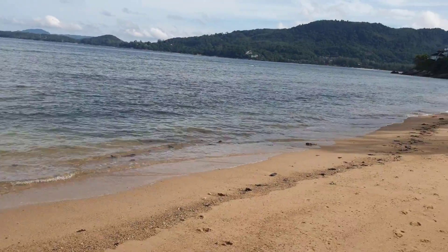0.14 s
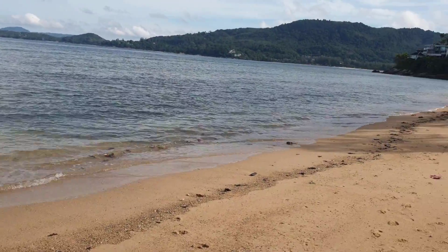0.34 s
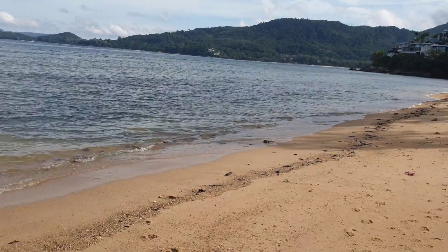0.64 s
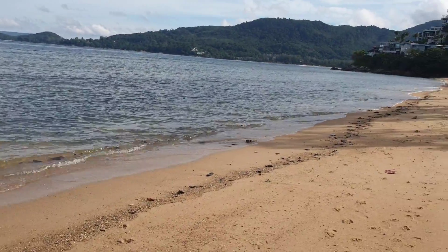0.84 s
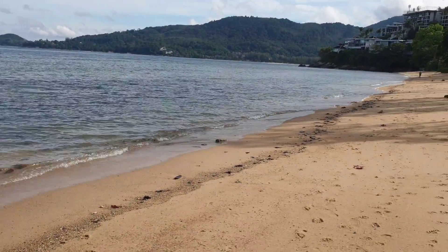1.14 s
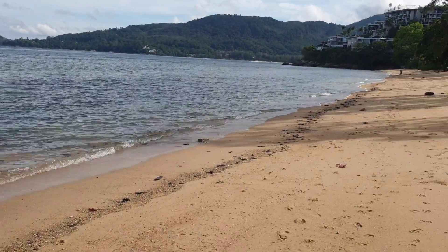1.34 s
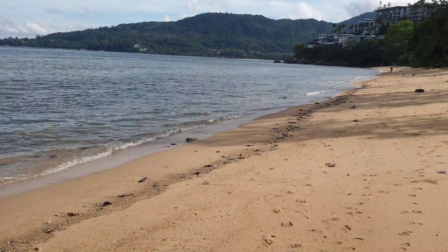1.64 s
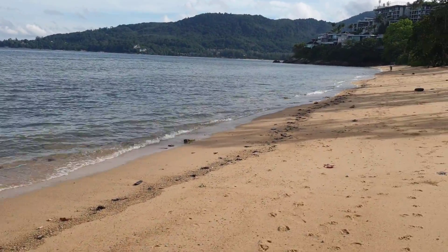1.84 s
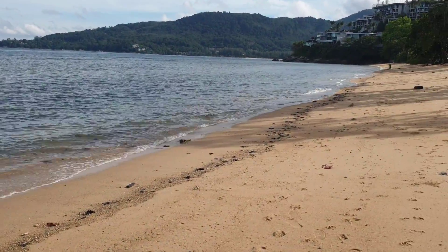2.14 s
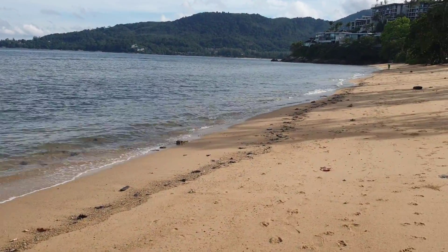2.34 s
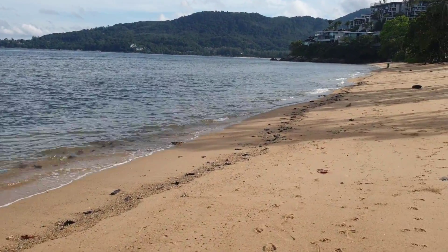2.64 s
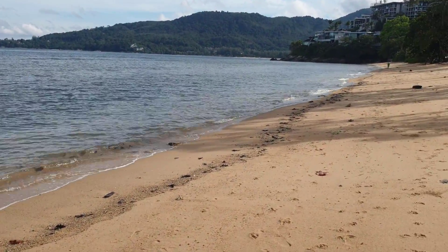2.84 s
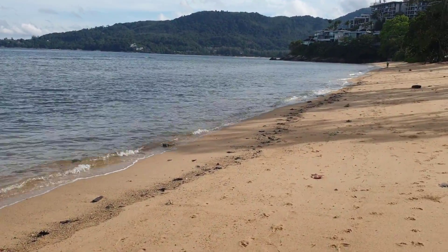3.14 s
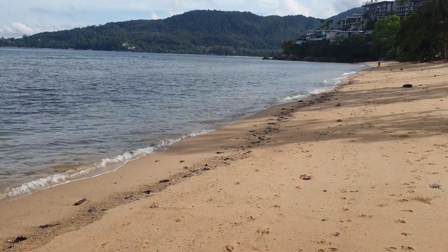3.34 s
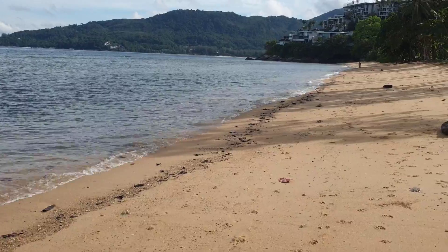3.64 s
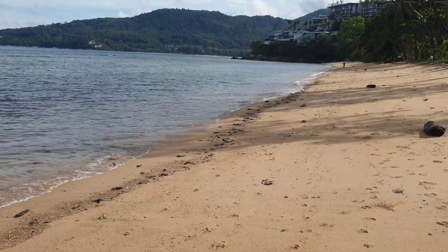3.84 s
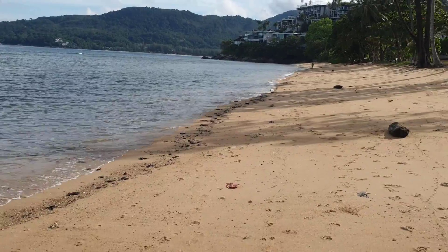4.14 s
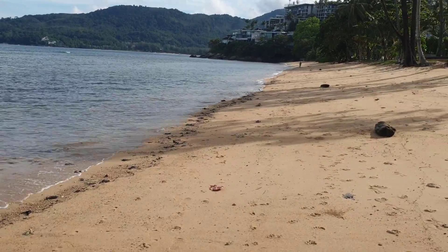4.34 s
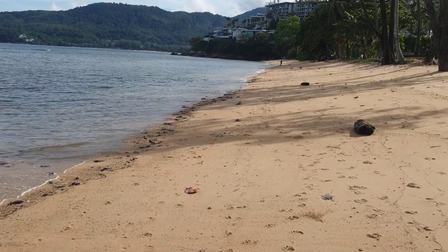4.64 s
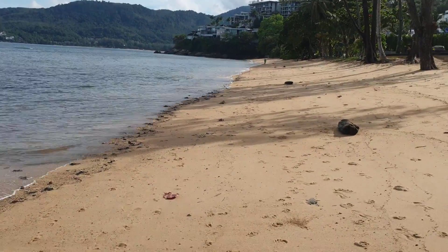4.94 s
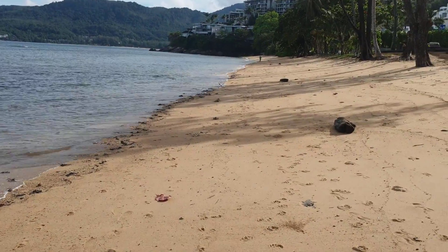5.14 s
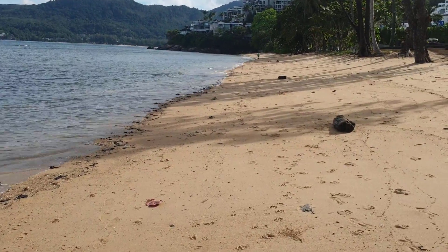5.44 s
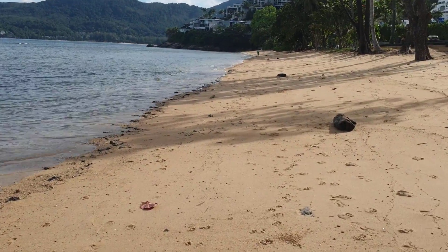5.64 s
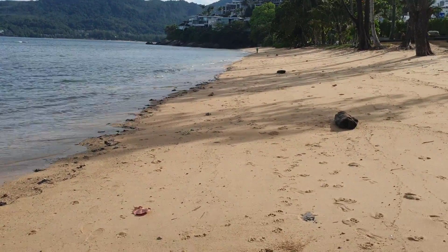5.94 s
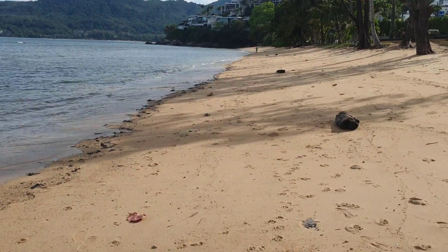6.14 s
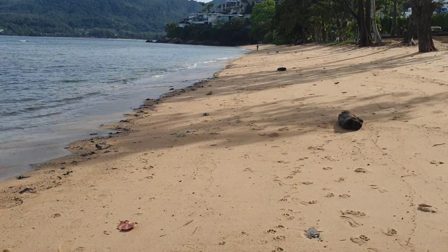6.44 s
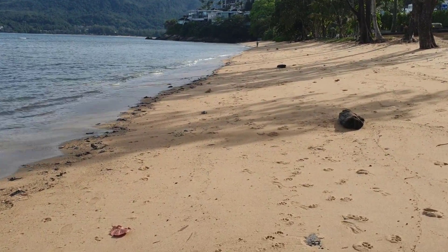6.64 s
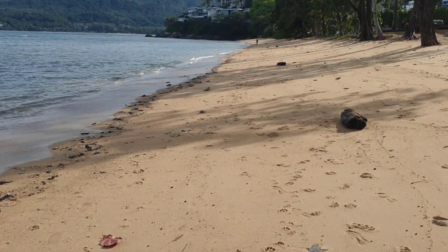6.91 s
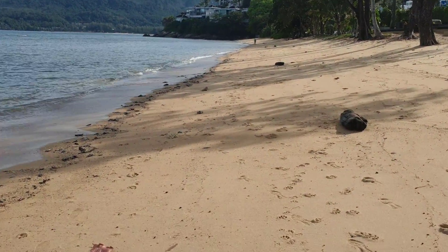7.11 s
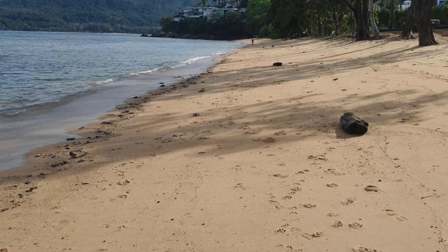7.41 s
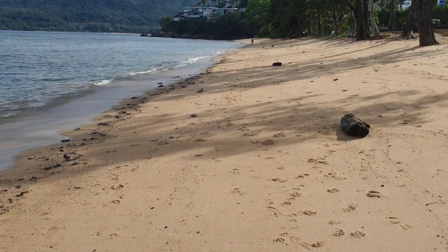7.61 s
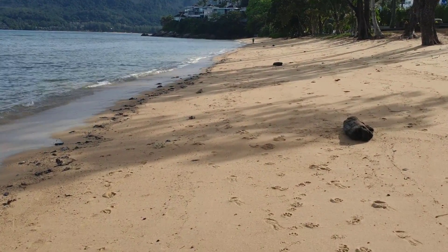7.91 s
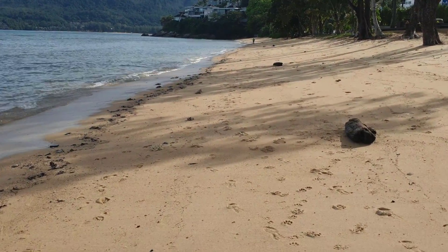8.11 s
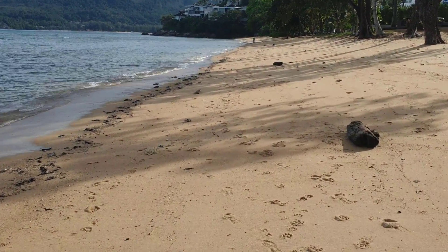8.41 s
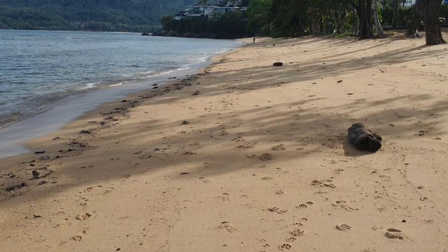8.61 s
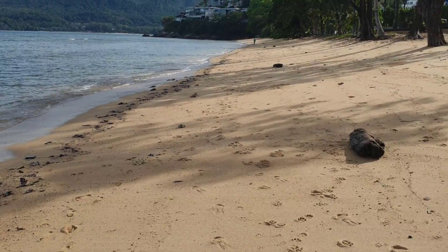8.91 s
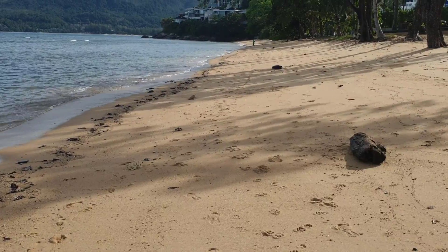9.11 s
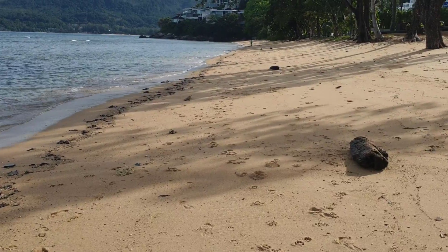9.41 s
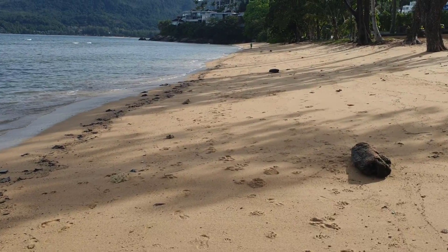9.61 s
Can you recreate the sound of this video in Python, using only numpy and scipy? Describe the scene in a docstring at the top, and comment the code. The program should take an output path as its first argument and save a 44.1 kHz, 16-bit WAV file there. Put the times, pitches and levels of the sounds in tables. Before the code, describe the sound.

Outdoor beach in stereo, with the water clearly louder on the right. Gentle wavelets bubble and trickle, swell into a crisp plunge with little pops, then thin to hissing foam. After a lull a second rounded, gurgling wave runs in, fading to sparse distant lapping before closer bubbling returns at the end. Low wind flutter and a few soft puffs touch the left side over a quiet sea murmur.

```python
"""A sandy beach: small waves curl over in clouds of bubbles and run up the sand as fizzing foam.
The water is filtered noise mixed with ringing bubbles. Large bubbles come mostly as a wave plunges;
small ones hiss on between waves. Splashes, slaps and the murmur of open water add to it.
The water is much louder on the right. On the left, a light breeze flutters (low noise) and thumps
(short low pulses)."""
import sys
import numpy as np
from scipy import signal
from scipy.fft import rfft, irfft, next_fast_len
from scipy.io import wavfile
from scipy.ndimage import uniform_filter1d

SR = 44100
rng = np.random.default_rng(int(sys.argv[2]) if len(sys.argv) > 2 else 0)


def inscribe(sig):
    """Save sig as 16-bit PCM at rate SR to the path in sys.argv[1].

    A 1-D sig is mono; a 2-D sig holds one channel per row.
    Samples are clipped to [-1, 1] before scaling.
    """
    pcm = np.round(np.clip(np.atleast_2d(sig).T, -1, 1) * 32767)
    wavfile.write(sys.argv[1], SR, pcm.astype(np.int16))


N = 430416

# Water levels in these tables hold before the pickup on the sand and at the microphones.

# Waves that spill, keep breaking, then die away. Depth adds large bubbles, fizz adds tiny ones.
# Columns: start_s, rise_s, hold_s, level_db, depth_db, fizz_db
WAVES = [(-0.11, 0.3, 0.34, -52, -12, 3), (0.268, 0.43, 0.01, -43.5, -2, 3),
         (0.917, 0.25, 0.025, -39, 0, 2), (1.223, 0.17, 0.28, -47.5, -2.5, 8),
         (1.62, 0.38, 0.017, -48, -0.5, 11.5), (2.496, 0.66, 0.14, -40, 6, 1),
         (2.914, 0.31, 0.17, -37, 8, 9.5), (5.466, 0.53, 0.24, -34, 3.5, 5.5),
         (6.27, 0.13, 0.25, -36, -0.7, -3), (6.516, 0.27, 0.077, -42, 1.5, -18),
         (6.887, 0.18, 0.39, -48.5, -15, -31), (7.43, 0.39, 0.21, -54, 0.5, -4),
         (8.07, 0.65, 0.12, -48, 0.5, 8), (8.695, 0.44, 0.19, -46, -1, -7),
         (9.073, 0.31, 0.019, -46.5, 7, -37), (9.503, 0.45, 0.17, -41.5, 5, -1.5)]
# Thin sheets of foam hissing over the sand: middle_s, half_length_s, level_db, fizz_db
FOAM_SHEETS = [(2.9, 0.35, -64.5, 25), (3.502, 0.18, -39, -4), (3.9, 0.18, -51.5, 11),
               (4.197, 0.17, -44.5, -3), (4.728, 0.25, -39, -6.5), (5.287, 0.086, -56.5, -1.5),
               (5.484, 0.045, -70, 7), (7.558, 0.024, -65, 16), (8.254, 0.28, -53, -4),
               (8.67, 0.025, -56, 3), (9.248, 0.16, -59.5, 20)]
# How each bubble size follows a wave; large bubbles come late and die first. One named row per size:
# level_db, rise_power (no unit), fade_db_per_s, depth_share, fizz_share, foam_sheet_level_db
BUBBLE_SIZES = {"plunge": (-9, 2.5, 61, 1, 0, -37), "wash": (-1.5, 1, 32.5, 0.15, 0, -13.5),
                "foam": (1.1, 0.56, 29.5, 0, 0, -11), "fine foam": (-0.5, 0.5, 17.5, 0, -0.04, -2.5),
                "seethe": (-6.5, 0.37, 27, 0, 0.6437, -0.74), "spray": (-13.5, 0.5, 15, 0, 1, -5.5)}
# Tone colour of each bubble size, from large to tiny: pitch_hz, relative_level_db
PLUNGE_COLOUR = [(200, -33), (380, -18), (520, -6.5), (660, 3.5), (850, 5), (1050, -1.5), (1500, -31),
                 (2500, -81)]
WASH_COLOUR = [(400, -61), (750, -14), (1000, -5), (1400, 0.5), (1750, 1.5), (2100, -6.5), (3000, -27),
               (5000, -70)]
FOAM_COLOUR = [(1000, -46), (1500, -15), (1850, -1), (2100, 1), (2400, 0), (2700, -2), (3400, -22),
               (5000, -73)]
FINE_FOAM_COLOUR = [(1400, -71), (2100, -15.5), (2500, -2.5), (2950, 3.5), (3400, -1.5), (3900, -4.5),
                    (4800, -10.5), (6500, -17), (9000, -85)]
SEETHE_COLOUR = [(2200, -31), (3600, 4.5), (4600, -2), (5800, 3.5), (6500, -1.5), (7400, -3), (8400, -20),
                 (10000, -33), (14000, -44)]
SPRAY_COLOUR = [(5000, -11.5), (8000, -16), (10000, 2.5), (11000, 6), (12000, 3), (13200, -1),
                (14200, -3.5), (15000, -26)]
# Pockets of air that fold under the crests and gulp around one pitch:
# middle_s, half_length_s, pitch_hz, spread_octaves, level_db
AIR_POCKETS = [(0.095, 0.031, 2660, 0.42, -48.5), (0.752, 0.037, 845, 0.42, -54),
               (0.771, 0.027, 1340, 0.37, -42.5), (0.78, 0.056, 2580, 0.32, -38.5),
               (1.21, 0.12, 2950, 0.36, -38.5), (1.517, 0.025, 820, 0.23, -52),
               (1.778, 0.018, 1190, 0.33, -49.5), (2.03, 0.08, 910, 0.42, -57.5),
               (2.402, 0.094, 2400, 0.42, -47), (2.597, 0.035, 790, 0.18, -55.5),
               (2.667, 0.086, 2140, 0.54, -48.5), (2.784, 0.035, 2380, 0.24, -40),
               (3.12, 0.073, 2570, 0.32, -30.5), (3.147, 0.017, 580, 0.35, -42),
               (3.268, 0.02, 1320, 0.29, -31), (3.278, 0.1, 596, 0.28, -47),
               (3.402, 0.029, 3220, 0.42, -31), (3.492, 0.033, 1060, 0.35, -40),
               (3.89, 0.029, 630, 0.22, -42), (4.077, 0.1, 1180, 0.4, -45.5),
               (4.68, 0.035, 3740, 0.18, -42), (5.3, 0.091, 1450, 0.12, -51),
               (5.426, 0.051, 2250, 0.37, -56.5), (5.873, 0.02, 2916, 0.1, -31.5),
               (5.882, 0.054, 480, 0.37, -43), (6.03, 0.052, 290, 0.45, -54), (6.05, 0.13, 2650, 0.24, -33),
               (6.064, 0.032, 507, 0.22, -44), (6.22, 0.03, 1690, 0.27, -32.5),
               (6.304, 0.1, 564, 0.41, -45.5), (6.42, 0.11, 3120, 0.26, -39.5),
               (7.69, 0.05, 3140, 0.2, -47), (7.782, 0.026, 680, 0.22, -50),
               (7.783, 0.033, 1410, 0.27, -52), (7.83, 0.055, 2300, 0.13, -50),
               (8.238, 0.053, 3240, 0.21, -45), (8.286, 0.035, 810, 0.16, -52),
               (8.47, 0.1, 1350, 0.12, -54.5), (8.584, 0.12, 3600, 0.28, -48.5),
               (8.915, 0.069, 1270, 0.35, -46.5), (9.06, 0.039, 2210, 0.43, -40.5),
               (9.177, 0.033, 2080, 0.34, -37.5), (9.28, 0.037, 1240, 0.3, -40),
               (9.275, 0.052, 2200, 0.25, -40), (9.273, 0.054, 6650, 0.44, -41),
               (9.442, 0.073, 1480, 0.27, -47), (9.66, 0.032, 2320, 0.24, -39.5),
               (9.663, 0.051, 4630, 0.11, -50), (9.743, 0.02, 2350, 0.22, -35)]
# Share of the sound that comes from farther along the shore: time_s, far_share (0 to 1)
FAR_SHARE = [(0, 0.08), (1.2, 0.3), (1.7, 0.77), (2.3, 1), (3, 0.16), (4.9, 0.25), (5.35, 0.45), (5.7, 0.2),
             (6.7, 0.13), (7.4, 0.8), (8.4, 0.82), (9.1, 0.18), (9.76, 0.28)]
# Thin water holds no large bubbles: time_s, lowest_bubble_pitch_hz
THIN_WATER = [(0, 1440), (0.35, 940), (0.6, 437), (2.05, 450), (2.3, 680), (2.47, 1480), (2.59, 550),
              (2.85, 450), (3.25, 151), (3.6, 453), (3.68, 770), (3.81, 2000), (4.08, 1720), (4.25, 2130),
              (4.47, 2280), (4.62, 1480), (4.74, 1910), (5.05, 2100), (5.42, 2250), (5.54, 1190),
              (5.8, 150), (6.83, 475), (7.12, 1160), (7.62, 1080), (7.77, 560), (7.87, 950), (8.15, 1050),
              (8.5, 690), (9.3, 830), (9.6, 1590)]
# Ripples in the tone of far sound grazing the sand, at first and later on: pitch_hz, gain_db
EARLY_RIPPLES = [(500, 2), (720, -1.5), (1000, 1.5), (1430, 7), (1680, -2.5), (2050, 2.5), (2800, 0),
                 (3600, 6), (4300, 3.5), (5200, -0.5), (6200, -4.5)]
LATE_RIPPLES = [(500, -4), (720, 2), (980, 0), (1430, 7.5), (1650, -4.5), (2100, -3.5), (2460, 2.5),
                (2740, -4.5), (3000, 2.5), (3220, -2), (3500, 4.5), (3950, 2), (4250, 4), (4750, -3),
                (5600, -4.5), (6200, -0.5)]
# The early ripples blend into the late ones between these times: from_s, to_s
RIPPLE_CHANGE = (4.9, 9.6)
# Wavelets that flick over close by: middle_s, half_length_s, level_db
SPLASH_TIMES = [(0.4, 0.032, -43.5), (4.63, 0.027, -41.5), (6.98, 0.037, -37), (8.068, 0.049, -37.5)]
# Tone colour of the splashes: pitch_hz, relative_level_db_per_hz
SPLASH_COLOUR = [(800, -24.5), (1500, 1.5), (2200, 6.5), (3500, 9.5), (4600, 7), (5500, -0.5), (7500, -17),
                 (12000, -11)]
# Slaps and pops of the curling crest, before their bass is cut: start_s, peak_db
SLAP_TIMES = [(3.0745, -19), (3.078, -20), (3.16, -19), (3.263, -19), (3.271, -20), (3.4012, -12.5)]
# Tone colour of the open water: pitch_hz, relative_level_db_per_hz
SEA_COLOUR = [(25, -4), (80, -4), (200, -11.5), (350, 1.5), (600, 6.5), (1200, 1.5), (3000, -1),
              (12000, -47)]
# Soft gusts that swell the flutter on the left: middle_s, half_length_s, level_db
GUST_TIMES = [(0.11, 0.14, -46), (0.6, 0.055, -44), (0.92, 0.047, -45), (1.23, 0.066, -49.5),
              (1.56, 0.097, -53.5), (2.26, 0.034, -48.5), (2.52, 0.063, -49.5), (2.83, 0.031, -49),
              (3.17, 0.02, -49), (3.6, 0.02, -52.5), (4.2, 0.065, -55.5), (5.47, 0.042, -52),
              (5.83, 0.025, -53), (5.97, 0.02, -52), (7.31, 0.083, -53.5), (7.5, 0.035, -53),
              (7.76, 0.053, -47.5), (7.93, 0.04, -50.5), (8.19, 0.17, -51.5), (8.75, 0.028, -53),
              (8.96, 0.028, -52), (9.7, 0.11, -48)]
# Puffs of air on the left, before the thump boost and bass cut: start_s, peak_db, knock_above_peak_db
PUFF_TIMES = [(0.595, -41.5, 8), (0.874, -34.5, -3), (0.93, -47, 4), (1.659, -59.5, 7), (2.819, -55, 1),
              (4.16, -56.5, 6), (7.279, -56, -6.5), (7.739, -56, -4), (7.904, -59, 14), (7.93, -58, 16.5)]
# Tone colour of the flutter: pitch_hz, relative_level_db_per_hz
FLUTTER_COLOUR = [(20, -34), (40, 5.5), (62, 9.5), (90, 3.5), (130, -3), (200, -17.5), (320, -24),
                  (700, -42), (2000, -90)]
# Loudness of water on the left compared with the right: pitch_hz, left_minus_right_db
LEFT_LEVEL = [(150, 2), (300, -6.5), (450, -15.5), (780, -7.5), (1050, -12.5), (1550, -11), (2200, -21.5),
              (3000, -21), (3700, -20.5), (5000, -21), (7500, -32.5), (9500, -6.5), (10800, -4),
              (13500, -18.5)]
# How alike the two sides are: pitch_hz, likeness (0 to 1)
LIKENESS = [(100, 0.31), (400, 0.89), (800, 0.69), (1550, 0.54), (2050, 0.27), (2500, 0.48), (3400, 0.2),
            (7000, 0.037)]
# How much earlier the left hears near and far water: pitch_hz, lead_s
NEAR_LEAD = [(500, .00033), (1850, .00032), (2250, .00043), (2600, .00041)]
FAR_LEAD = [(1000, .00014), (1500, .00024), (2250, .00043)]
# Where the water washes; only a scaled swing around the average is used: time_s, left_minus_right_db
SHORE_BEARING = [(0.0, -33), (0.92, -8), (1.0, -22), (1.96, -11), (2.39, -20), (2.53, -9), (2.72, -18),
                 (3.45, -10.5), (4.43, -25), (4.67, -8), (4.95, -22), (5.38, -29), (5.54, -38), (5.82, -13),
                 (6.58, -18.5), (8.37, -15), (9.0, -24), (9.76, -19)]
# Level under which noise suppression turns the left down: pitch_hz, threshold_db
QUIET_THRESHOLD = [(800, -125), (1800, -100), (2800, -66), (5000, -69.5), (7500, -81), (9500, -110),
                   (11400, -108), (12200, -95), (15000, -91)]

CONTROL_S = 0.002  # time step of the slow level curves
SLOSH_DB, CHURN_DB, TRICKLE_DB = 0.7, 0.65, 1.0  # size of the random level swings
DRAIN_STEEPNESS = 10  # how sharply thin water cuts low bubbles
BREEZE_DB, EDDY_DB = -62, 1.5  # flutter between the gusts, and its random swing
TOP_HZ = 15050  # nothing is kept from here up


def surf():
    """Waves break into bubbles of every size, from deep gulps to fine spray; large ones slosh unevenly."""
    gain = {size: strength(*rule) for size, rule in BUBBLE_SIZES.items()}

    large = bubbles(254.0, 1100, rate=400, cycles=16.6, spread_db=1.5)
    medium = bubbles(810.0, 2249, rate=600, cycles=47.0, spread_db=1.5, rise=0.076)
    small = bubbles(1662, 4800, rate=1800, cycles=16.6, spread_db=0.5, rise=0.13)
    tiny = bubbles(3800, 10000, rate=1500, cycles=12.0, spread_db=2.5)
    bursting = bubbles(9140, 14600, rate=1600, cycles=6.6, spread_db=3.0)

    plunge = cloud(PLUNGE_COLOUR, large, singles_db=-12.5, churn_db=CHURN_DB)
    wash = cloud(WASH_COLOUR, medium, singles_db=-13.5, churn_db=CHURN_DB)
    foam = cloud(FOAM_COLOUR, small, singles_db=-12.0, churn_db=0.5)
    fine_foam = cloud(FINE_FOAM_COLOUR, small, singles_db=-15.5, churn_db=0.65)
    seethe = cloud(SEETHE_COLOUR, tiny, singles_db=-10.0, churn_db=0.5)
    spray = cloud(SPRAY_COLOUR, bursting, singles_db=-9.5, churn_db=0.93)

    water = pockets()
    water += gain["plunge"] * amp(SLOSH_DB * wobble(14)) * plunge
    water += gain["wash"] * amp(SLOSH_DB * wobble(13)) * wash
    water += gain["foam"] * foam
    water += gain["fine foam"] * fine_foam
    water += gain["seethe"] * seethe
    water += gain["spray"] * spray
    surge = amp(0.31 * wobble(50))  # all sizes surge together as the crest tumbles
    return over_sand(water * surge)


def strength(level_db, power, fade_db_per_s, depth_share, fizz_share, sheet_level_db):
    """Loudness of one bubble size over time: the energies of all waves add up, then join the foam sheets."""
    t = np.arange(0, N / SR, CONTROL_S)
    start, rise, hold, wave_db, depth_db, fizz_db = np.transpose(WAVES)[:, :, None]
    progress = np.clip((t - start) / rise, 0, 1)
    spill = (.5 - .5 * np.cos(np.pi * progress)) ** power
    fade_db = fade_db_per_s * np.maximum(t - start - rise - hold, 0)
    peak_db = wave_db + level_db + depth_share * depth_db + fizz_share * fizz_db
    waves = np.linalg.norm(spill * amp(peak_db - fade_db), axis=0)

    sheets = np.zeros(len(t))
    for middle, half_length, sheet_db, sheet_fizz_db in FOAM_SHEETS:
        sheets += bell(t, middle, half_length) * amp(sheet_db + sheet_level_db + fizz_share * sheet_fizz_db)
    return np.interp(np.arange(N) / SR, t, np.hypot(waves, sheets))


def pockets(singles_db=-7):
    """Each pocket of air breaks into a short-lived cloud of bubbles of about one size."""
    singles = bubbles(299.0, 4030, rate=900, cycles=15.0, spread_db=-0.5)
    froth = with_bubbles(singles, singles_db)
    out, size = np.zeros((2, N)), SR // 2
    hz = np.fft.rfftfreq(size, 1 / SR) + 1
    soft_edges = signal.get_window(("tukey", .2), size)
    for middle, half_length, pitch_hz, octaves, level_db in AIR_POCKETS:
        at = min(int(middle * SR) - size // 2, N - size) + np.arange(size)
        around_pitch = bell(np.log2(hz / pitch_hz), 0, octaves)
        gulp = unit(irfft(rfft(froth[:, at]) * around_pitch, size))
        out[:, at] += amp(level_db) * bell(at / SR, middle, half_length) * soft_edges * gulp
    return out


def bubbles(low_hz, high_hz, rate, cycles, spread_db, rise=0.11):
    """Single bubbles (rate per second) ring for some cycles, rising in pitch as they near the surface."""
    when, pitch, size, life, sign = rng.random((int(rate * N / SR), 5)).T
    hz = low_hz * (high_hz / low_hz) ** pitch
    length = cycles * (.5 + life) / hz  # seconds to fade by 40 dB
    t = np.arange(int(length.max() * SR)) / SR
    age = t / length[:, None]
    loudness = amp(-spread_db * np.log(np.maximum(size, .01))) * np.sign(sign - .5)
    ring = np.sin(2 * np.pi * hz[:, None] * t * (1 + rise * age)) * np.exp(-np.log(100) * age)
    at = (when * N).astype(int)[:, None] + np.arange(len(t))
    # bincount adds every ring into one line of sound
    return unit(np.bincount(at.ravel(), (loudness[:, None] * ring).ravel(), N)[:N])


def with_bubbles(singles, singles_db):
    """Two channels of noise, the rush of countless merged bubbles, with single bubbles mixed in."""
    shifted = np.roll(singles, N // 3)  # other moments for the second channel
    return rng.standard_normal((2, N)) + amp(singles_db) * np.array([singles, shifted])


def cloud(spectrum, singles, singles_db, churn_db):
    """A bubble cloud at average strength 1: single and merged bubbles that churn as the water tumbles."""
    sound = coloured(with_bubbles(singles, singles_db), spectrum)
    return unit(sound * amp(churn_db * wobble(30)))


def over_sand(water, near_db=0.5, far_db=1.0, sparse_db=2.2, leak_db=-19):
    """Thin water loses most large bubbles and trickles in patches; reflection off the shore ripples the tone."""
    hz, t, z = signal.stft(water, SR, nperseg=512)
    far = far_share(t)
    later = np.interp(t, RIPPLE_CHANGE, (0, 1))
    early_db = along(EARLY_RIPPLES, hz)[:, None]
    late_db = along(LATE_RIPPLES, hz)[:, None]
    grazing_db = (1 - later) * early_db + later * late_db
    ripple_db = far * grazing_db + (near_db + far_db * far) * patches(z.shape[1:], size=4, count=60)
    patchiness_db = TRICKLE_DB + sparse_db * far * (1 + later) / 2
    trickle_db = patchiness_db * patches(z.shape[1:], size=4, count=11)
    lowest_hz = np.interp(t, *np.transpose(THIN_WATER))
    drained = 1 / np.hypot(1, (lowest_hz / (hz[:, None] + 1)) ** DRAIN_STEEPNESS)
    shaped = z * np.maximum(drained, amp(leak_db)) * amp(ripple_db + trickle_db)
    return signal.istft(shaped, nperseg=512)[1][:, :N]


def splashes():
    """Wavelets throw up tumbling droplets: brief bright swishes of noise and bubbles."""
    drops = bubbles(1400, 6000, rate=900, cycles=14, spread_db=2.5)
    return swells(SPLASH_TIMES) * cloud(SPLASH_COLOUR, drops, singles_db=-9.5, churn_db=0.9)


def slaps():
    """The lip of the crest smacks the water and pops pockets of air, too small to radiate any bass."""
    pops = strikes(SLAP_TIMES, hz=2700, t60=.004, attack=.00015)
    return filtered(pops, lambda hz: (1j * hz / (700 + 1j * hz)) ** 4)


def open_water():
    """The sea murmurs as soft coloured noise whose level slowly wanders."""
    murmur = coloured(rng.standard_normal((2, N)), SEA_COLOUR)
    return amp(-66.5 + 1.46 * wobble(8.9)) * murmur


def breeze():
    """Eddies flutter on the left microphone and swell in gusts; puffs thump it, each with a short knock."""
    flutter = coloured(rng.standard_normal(N), FLUTTER_COLOUR)
    flutter = unit(flutter * amp(1.6 * wobble(38)))
    flow = np.hypot(amp(BREEZE_DB + EDDY_DB * wobble(36)), swells(GUST_TIMES))
    thump_rows = [(s, db) for s, db, _ in PUFF_TIMES]
    knock_rows = [(s, db + knock_db) for s, db, knock_db in PUFF_TIMES]
    thumps = amp(15.5) * strikes(thump_rows, hz=84, t60=0.048, attack=0.0033)
    knocks = strikes(knock_rows, hz=180, t60=0.039, attack=0.00092)
    # the microphone opening leaks the deepest bass
    return filtered(flow * flutter + thumps + knocks, lambda hz: (1j * hz / (36 + 1j * hz)) ** 2)


def microphones(pair):
    """Two unrelated sounds become a right side and an earlier, partly alike left; far water leads less."""
    hz, t, z = signal.stft(pair, SR, nperseg=1024)
    far = far_share(t)
    hz = hz[:, None]
    lead = (1 - far) * along(NEAR_LEAD, hz) + far * along(FAR_LEAD, hz)
    alike = np.clip(along(LIKENESS, hz), 0, 1)
    shared = z[0] * alike * np.exp(2j * np.pi * hz * lead)  # turning the phase makes it earlier
    left = (shared + z[1] * np.sqrt(1 - alike ** 2)) * amp(along(LEFT_LEVEL, hz))
    return np.array([signal.istft(left, nperseg=1024)[1][:N], pair[0]])


def suppressed(x, floor_db=-20):
    """Noise suppression: bands that fall under a threshold are turned further down."""
    hz, t, z = signal.stft(x, SR, nperseg=512)
    power = uniform_filter1d(np.abs(z) ** 2, size=7, axis=0)
    power = np.abs(uniform_filter1d(power, size=15, axis=1))
    threshold = amp(along(QUIET_THRESHOLD, hz))[:, None] ** 2
    gain = np.maximum(power / (power + threshold), amp(floor_db))
    return signal.istft(z * gain, nperseg=512)[1][:N]


def strikes(rows, hz, t60, attack):
    """A pulse at each (start_s, peak_db) row, near one pitch, dying by 60 dB in t60 seconds."""
    out, t = np.zeros(N + SR), np.arange(SR // 4) / SR
    for start, peak_db in rows:
        pitch_hz = hz * np.exp(rng.normal(0, 0.13))
        pulse = np.sin(2 * np.pi * pitch_hz * t) * amp(-60 * t / t60) * (1 - np.exp(-t / attack))
        out[round(start * SR):][:len(t)] += amp(peak_db) * pulse / np.abs(pulse).max()
    return out[:N]


def swells(rows):
    """A bell-shaped gain around each (middle_s, half_length_s, level_db) row."""
    t = np.arange(0, N / SR, CONTROL_S)
    gain = sum(amp(db) * bell(t, middle, half_length) for middle, half_length, db in rows)
    return np.interp(np.arange(N) / SR, t, gain)


def bell(t, middle, width):
    """A smooth rise and fall around the middle."""
    return np.exp(-.5 * ((t - middle) / width) ** 2)


def far_share(t):
    """Share of sound from farther along the shore at each time."""
    return np.clip(np.interp(t, *np.transpose(FAR_SHARE)), 0, 1)


def patches(shape, size, count):
    """A random field of average strength 1, smooth over size bands and count time frames."""
    field = uniform_filter1d(rng.standard_normal(shape), size, axis=0)
    return unit(uniform_filter1d(field, count, axis=1))


def wobble(rate):
    """A smooth random curve through about rate random points a second."""
    knots = rng.standard_normal(int(N * rate / SR) + 4)
    return signal.resample(knots, next_fast_len(N))[:N]


def coloured(x, spectrum):
    """x shaped to a tone colour, at average strength 1."""
    return unit(filtered(x, lambda hz: amp(along(spectrum, hz))))


def filtered(x, response):
    """x with each pitch multiplied by response(hz)."""
    size = next_fast_len(N + 8192, True)
    return irfft(rfft(x, size) * response(np.fft.rfftfreq(size, 1 / SR)), size)[..., :N]


def along(points, hz):
    """Values read between (pitch_hz, value) points, on a log pitch axis."""
    f, v = np.transpose(points)
    return np.interp(np.log(hz + 1), np.log(f + 1), v)


def amp(db):
    """Decibels to gain."""
    return np.exp(np.asarray(db) * (np.log(10) / 20))


def unit(x):
    """x scaled to average strength (rms) 1."""
    return x / np.sqrt(np.mean(x ** 2) + 1e-20)


def scene():
    """Surf over the murmur of open water, breeze on the left; the finest spray is not moved by the bearing."""
    water = surf() + splashes() + slaps() + open_water()
    left, right = amp(5.5) * microphones(water)
    spray = filtered(left, lambda hz: hz > 8400)
    bearing_db = np.interp(np.arange(N) / SR, *np.transpose(SHORE_BEARING))
    swing = amp(0.39 * (bearing_db - bearing_db.mean()))
    return np.array([(left - spray) * swing + spray + breeze(), right])


def record(dry, notch_hz=8400, notch_width_hz=1300):
    """Faint left sound is hushed; both sides get a deep notch and lose everything above the top pitch."""
    def response(hz):
        distance = (hz - notch_hz) ** 2
        notch = distance / (distance + (notch_width_hz / 2) ** 2)
        return notch * (hz < TOP_HZ)

    return filtered(np.array([suppressed(dry[0]), dry[1]]), response)


dry = scene()
out = record(dry)
inscribe(out)
```